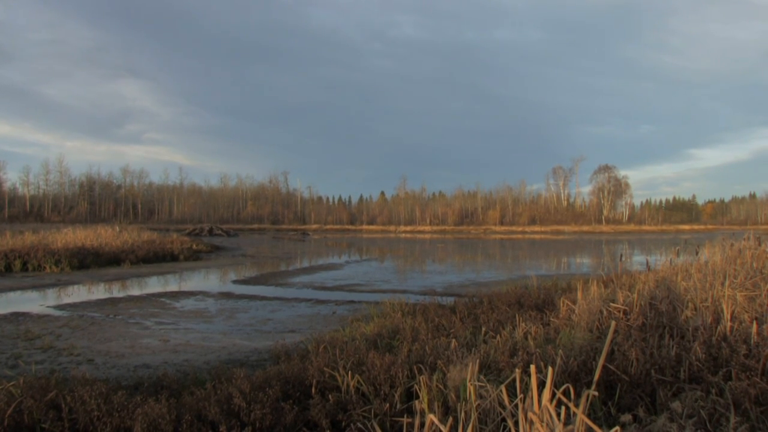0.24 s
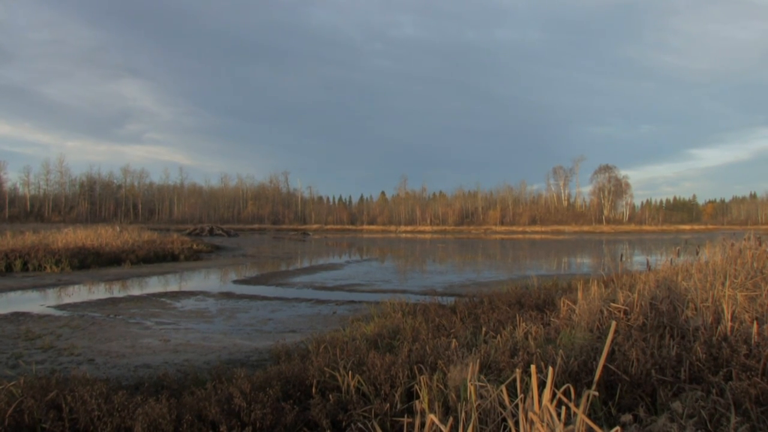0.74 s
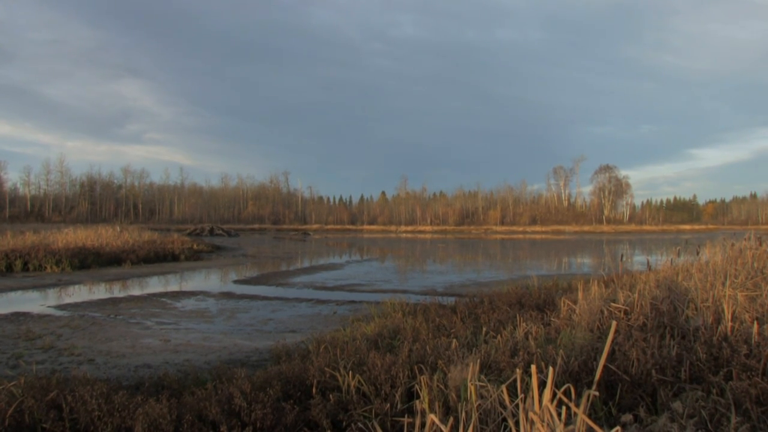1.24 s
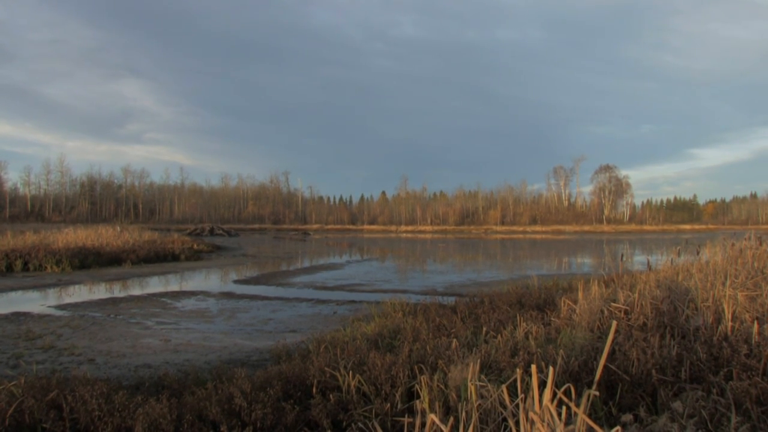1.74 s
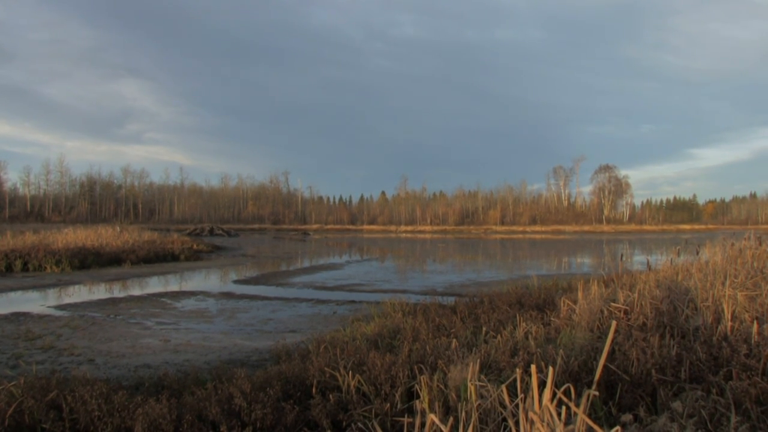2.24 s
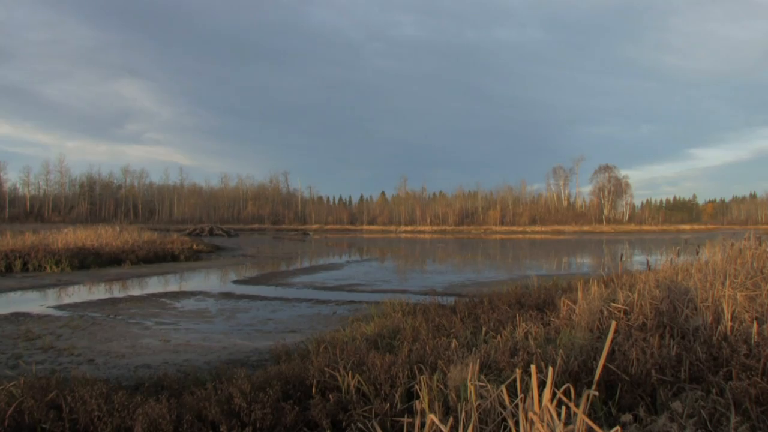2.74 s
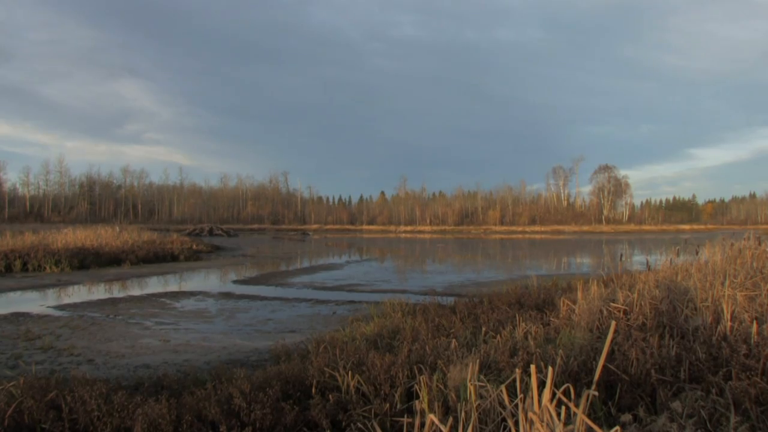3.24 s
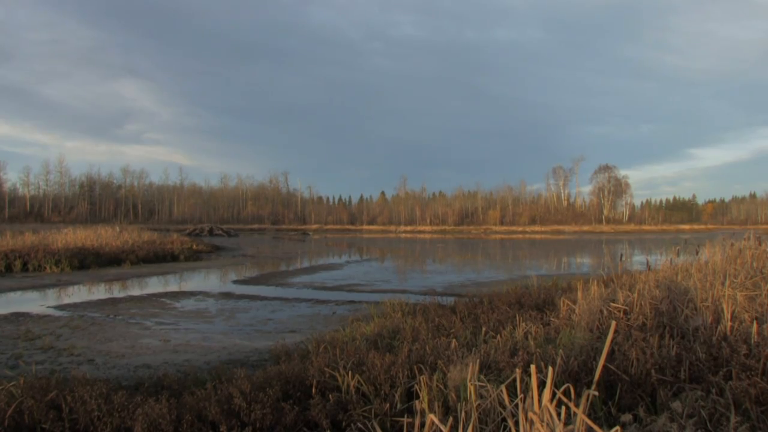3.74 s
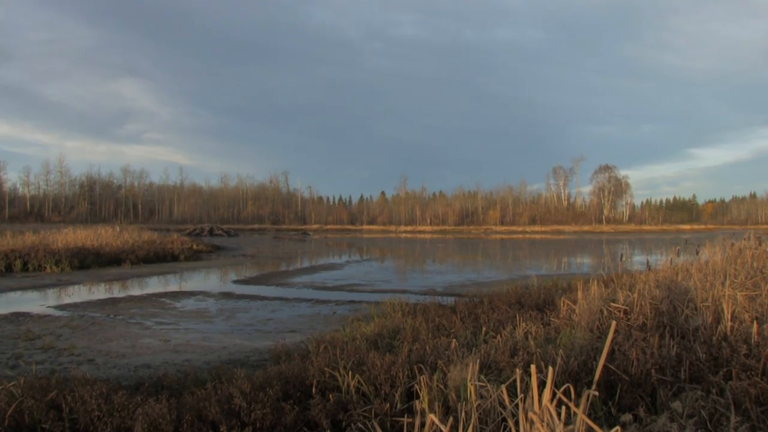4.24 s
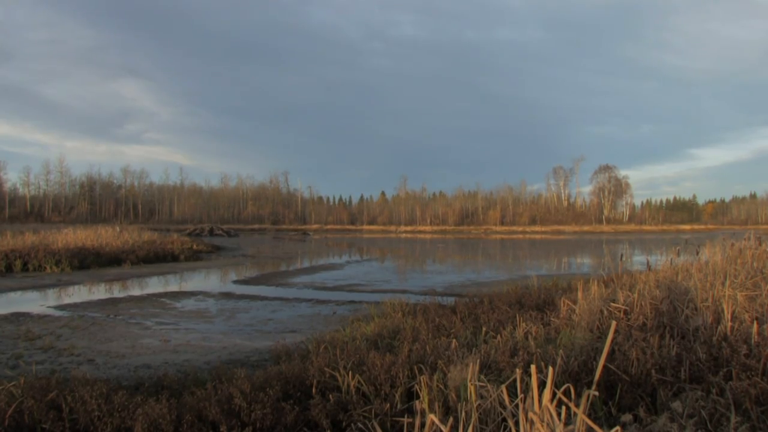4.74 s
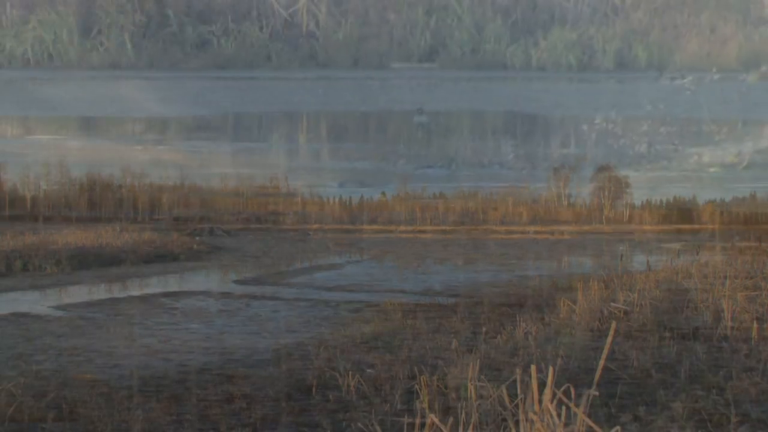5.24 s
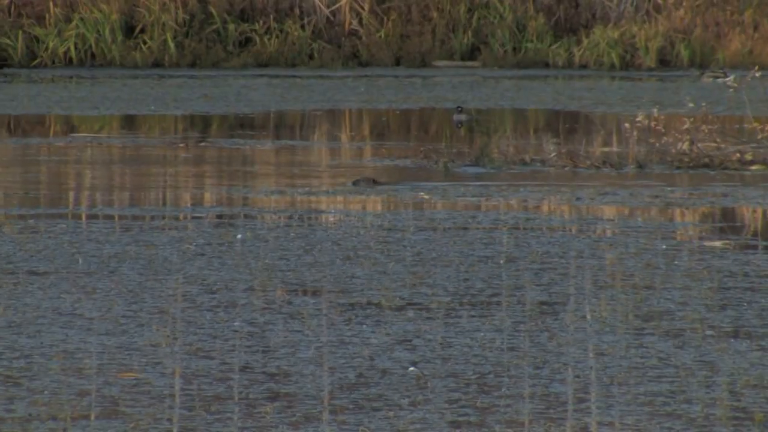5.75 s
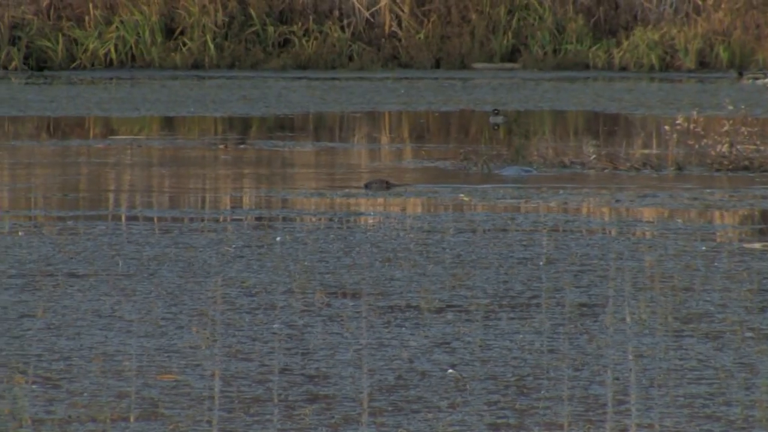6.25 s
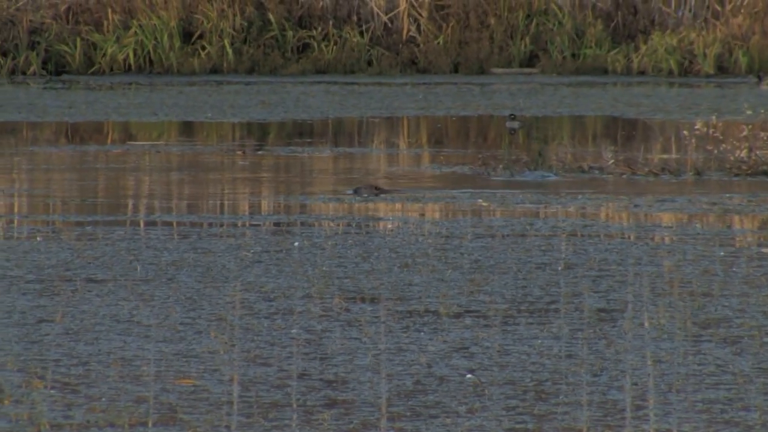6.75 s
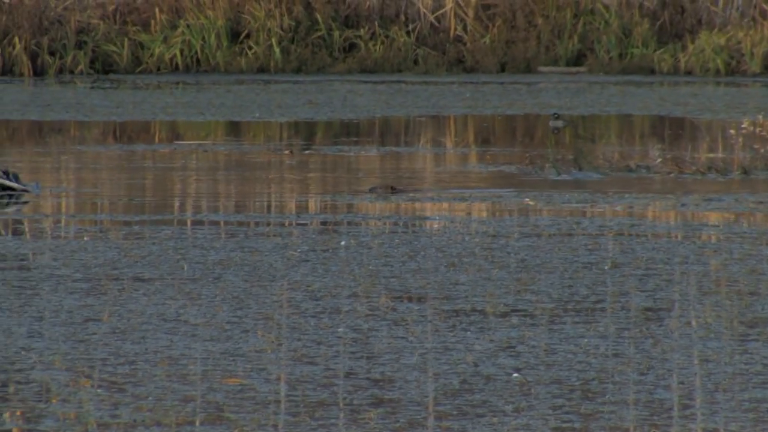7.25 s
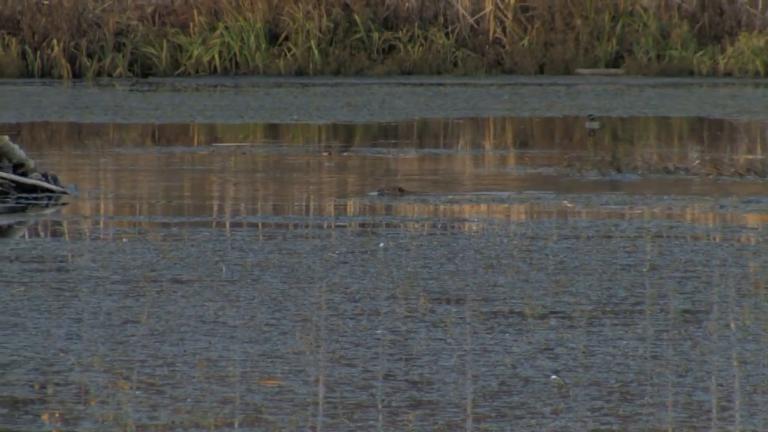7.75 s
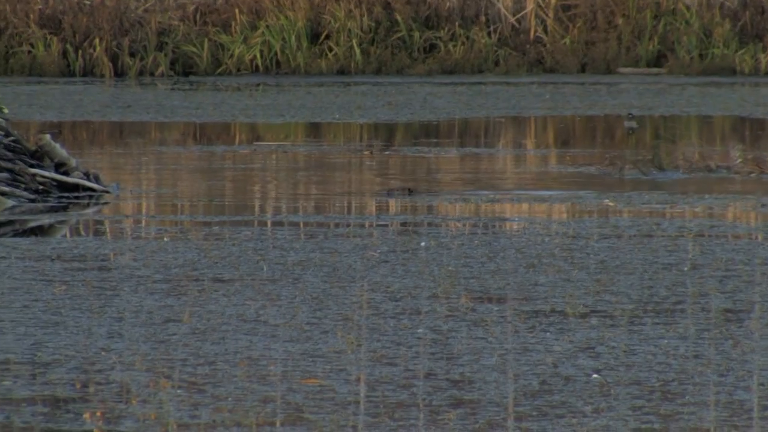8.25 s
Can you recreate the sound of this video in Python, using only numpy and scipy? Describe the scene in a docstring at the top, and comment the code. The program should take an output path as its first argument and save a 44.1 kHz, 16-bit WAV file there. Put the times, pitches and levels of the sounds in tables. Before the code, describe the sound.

Brassy swan calls drift rightward and recede across a lake, echoing off far woods, joined by regular nasal duck quacks close by.

```python
"""Swans leaving a marshy lake

Bugling, yelping and grunting swans fly across from left to right; the forest on the far shore throws calls back.
Their voices are harmonics and noise shaped by windpipe and bill; more of the flock murmurs far away.
From two seconds on a duck close by, dead centre, quacks steadily: trains of snaps ring its throat.
Small ticks, late songbird slurs and, swelling in early, low rumble and thin hiss are shaped noise and gliding tones."""
import sys
import numpy as np
from scipy import signal
from scipy.fft import rfft, irfft, next_fast_len
from scipy.io import wavfile
from scipy.ndimage import uniform_filter1d, map_coordinates

SR = 44100
rng = np.random.default_rng(int(sys.argv[2]) if len(sys.argv) > 2 else 0)


def store_wav(level_fs):
    """Save 16-bit WAV to argv[1]."""
    pcm = np.round(np.clip(np.atleast_2d(level_fs), -1, 1) * 32767)
    wavfile.write(sys.argv[1], SR, pcm.T.astype(np.int16))


N = 374409

# All levels and colours in these tables are relative dB unless called rms.
# Still air, its spectrum: freq_hz, density_db
AIR_COLOUR = [(20,-2.5),(45,3),(70,-9.5),(120,-15),(250,-14.5),(500,-10),(1000,-16),(2500,-19),(5000,-33),(8000,-38),(15000,-38.5)]
# How the still air swells in: time_s, level_db
AIR_RISE = [(0,-33),(1.05,-29.5),(1.4,-6),(2.2,-2),(3,2),(8.49,1)]
# Left-right difference of the air: freq_hz, gain_db
AIR_SIDE = [(100, -35), (600, -9.5), (3000, 25.5), (7000, 16.5), (11000, -5.0)]

# The swan's long windpipe: freq_hz, gain_db
WINDPIPE = [(60,-50.5),(300,-30),(520,-9),(750,-19.5),(1000,-12),(1200,4.5),(1550,3),(1800,-13.5),(2200,-25.5),(3000,-19),(5000,-55),(9000,-66)]
# The brassy edge of a hard-blown bugle: freq_hz, gain_db
BRASS = [(1600,-39),(2200,9.5),(2900,-3.5),(3200,-1.5),(3600,2),(4000,-1),(4400,-2.5),(5050,-1.5),(5500,5),(5800,1.5),(6400,-4),(7300,-15.5),(8000,-17),(8700,-21.5),(9500,-21.5),(12000,-33.5),(16000,-45.5)]
# The edge of a yelp or toot, blown with the bill half shut: freq_hz, gain_db
HALF_SHUT_BILL = [(1600,-28),(2450,11),(3300,-0.5),(4200,4),(5000,1.5),(5900,-2.5),(6900,-5.5),(8200,-22.5),(11000,-31.5),(16000,-49)]
# Falling toots that lead into a bugle or break off its end: start_s, length_s, pitch_hz, level_db, brassy_edge_db
TOOTS = [(0.0,0.039,711,-42,-45), (0.834,0.031,625,-40,-53.5), (1.858,0.021,648,-38,-61),
         (2.202,0.017,670,-39,-49), (2.867,.03,648,-43,-55.5), (3.885,0.043,654.5,-44,-60),
         (4.745,0.035,668,-45,-56.5), (5.776,0.051,661,-45,-65.5), (8.107,0.048,658,-50.5,-84)]
# Low grunts that swoop up near the end: start_s, length_s, top_pitch_hz, drone_db, top_level_db
GRUNTS = [(0.0,0.043,550,-54.5,-46), (0.469,0.21,584.5,-65,-38.5), (0.756,0.06,606,-76,-55.5),
          (1.498,.19,589.4,-60.5,-37.5), (2.13,.13,562,-63,-39), (2.532,.13,590,-57.5,-38.5),
          (3.467,.2,583.7,-59.5,-41), (4.484,0.17,584,-64.5,-41.5), (5.502,.109,572,-63.5,-46),
          (6.347,0.17,556,-74.5,-62), (6.663,0.083,518.4,-67,-56), (7.62,0.077,566,-71.5,-49.5)]
# Long bugle notes: start_s, length_s, attack_s, wait_before_climb_s, opening_hz, crest_hz,
# scoop_from_below (share of pitch), opening_level_db, crest_level_db, brassy_edge_db
BUGLES = [(0.027,0.18,0.024,0.00069,796.4,767.6,0,-31.5,-36.5,-41.5),
          (0.921,.351,0.076,.035,690.7,734.2,0.03,-37,-40.5,-47),
          (1.912,.318,0.011,0.025,688,737,0.1,-41,-43.5,-50.5),
          (2.932,0.3,0.014,.03,679,737.4,0.05,-41,-49,-56),
          (3.952,0.24,0.043,0.092,648.3,728,0.07,-43.5,-51,-57.5),
          (4.813,0.28,0.018,0.046,688.5,724.5,0.08,-48.5,-49,-63),
          (5.858,.225,0.031,.065,673,719.4,.12,-44,-48,-67),
          (7.761,0.21,0.027,0.052,687.2,745.3,0.04,-44.5,-50,-69.5),
          (8.191,0.23,0.015,0.093,679.4,714.6,.08,-46,-46.5,-66.5)]
# Short high yelps: start_s, length_s, top_pitch_hz, level_db, brassy_edge_db
YELPS = [(0.613,0.039,781,-43.5,-71), (0.666,0.053,853,-47,-48.5), (1.61,0.075,779,-48,-68),
         (1.673,0.062,863,-49,-45), (1.833,0.077,811,-40,-45), (2.256,.076,763,-44,-52),
         (2.645,0.048,850,-49.5,-62.5), (2.964,0.057,783,-52.5,-56.5), (3.637,0.075,857,-54.5,-63.5),
         (4.637,0.073,857,-55.5,-56.5), (5.585,0.073,851,-56,-57), (6.482,0.051,820,-52.5,-74),
         (6.738,0.091,814.6,-50,-58.5), (8.209,0.0815,813,-48,-58)]
# Where the swans fly: time_s, left_minus_right_db
BEARING = [(0,7),(.7,2),(1.2,4.5),(1.8,0.5),(2.2,1.5),(2.6,-1.5),(4,-5),(5.7,-7.5),(8.4,-7)]
# Echo gain against the direct calls as the birds draw away: time_s, gain_db
RECEDING = [(0,0.5),(2,2),(3,3),(5,5.5),(6.5,0),(6.9,11.5),(7.6,8),(8.49,-1)]

# The blurred murmur of the far flock: freq_hz, density_db
MURMUR = [(40,-43.5),(130,-20.5),(220,-26),(320,-18.5),(500,-4),(850,-8.5),(1200,7.5),(1550,4),(1900,-22.5),(3000,-7),(5000,-14.5),(6500,-27),(8500,-44.5),(15000,-56.5)]
# The course of the far flock's loudness: time_s, level_db
FLOCK_LEVEL = [(0,-58), (1.4,-65.5), (2.8,-59), (3.4,-70), (5.2,-68.5), (6.5,-70), (7.5,-73.5), (8.49,-62)]
# Decay of the far shore's echo: freq_hz, t60_s
SHORE_T60 = [(400,3.5),(1500,1.9),(4000,0.99),(8000,0.7),(14000,3.5)]
# Colour of the far shore's echo: freq_hz, gain_db
SHORE_COLOUR = [(150,-8),(400,-9.5),(800,-2),(1500,-4.5),(2300,0.5),(3000,-2.5),(4400,10.5),(5800,0.5),(8000,9),(12000,-11)]
# Colour of the scatter from stems and mud close by: freq_hz, gain_db
REED_COLOUR = [(300, -21.5), (1500, -5.5), (3000, 11.5), (6000, 12.0)]

# Small dry ticks, single or in runs: start_s, run_length_s, level_db
TICKS = [(0.3,.005,-52), (0.499,.055,-51), (0.745,.005,-48), (1.506,.055,-51.5), (3.266,.02,-50),
         (3.421,.1,-55.5), (3.902,.11,-54), (4.425,.05,-55), (5.2889,.005,-51), (5.659,.08,-53),
         (5.877,.08,-67), (6.543,.005,-59), (7.448,.03,-60)]
# Colour of the ticks: freq_hz, gain_db
TICK_COLOUR = [(800, -39), (3000, 12), (6000, 7.5), (12000, -18)]
# Quacks: start_s, end_s, nominal_pulse_rate_hz, rms_level_db, bill_opening (factor on throat resonances)
QUACKS = [(2.055,2.152,175,-47,0.87),(2.515,2.65,183.8,-43.5,0.98),(3.091,3.245,182,-41,0.98),(3.663,3.832,189.6,-38,1.002),(4.212,4.379,187.3,-38.5,1),(4.779,4.966,188.4,-37.5,1.01),(5.367,5.528,186.5,-38.5,0.99),(5.93,6.104,186.6,-39,1),(6.545,6.701,187.2,-38,1.002),(7.114,7.289,189,-39,1.007),(7.673,7.848,190,-38,0.99),(8.24,8.405,187,-39,0.99)]
# Course of one quack: share_of_length, pulse_rate_factor, bill_opening (further factor), level_db
QUACK_COURSE = [(0,.83,0.8,-14),(0.151,.9,0.94,-3),(.37,.975,0.97,1),(0.6,1.008,0.98,1),(0.883,1.003,1.01,1),(0.999,.98,0.97,-4)]
# The duck's throat resonances: freq_hz, gain_db
DUCK_THROAT = [(170,-38.5),(250,-15),(370,-11.5),(560,-24),(750,-11.5),(1080,-22.5),(1350,-10),(1560,-12),(1780,1.5),(2130,2),(2450,-7.5),(2800,-27.5),(3150,-22.5),(3700,-54.5),(5600,-40),(8000,-70)]
# The duck's breath hiss: freq_hz, gain_db
DUCK_HISS = [(1000,-19),(3000,3.5),(3800,-7),(5500,3),(7000,-13),(8500,-24),(15000,-33.5)]
# A small songbird's slurs: start_s, length_s, from_hz, to_hz, rms_level_db
CHIRPS = [(7.488,0.11,3080,2770,-79.5),(7.51,0.036,4130,3860,-78),(7.586,0.042,3500,3250,-80),(7.979,0.028,4300,3890,-75),(8.091,0.023,3700,4200,-76),(8.12,.035,3400,3050,-74),(8.13,0.026,4150,3740,-74)]

EDGE_HZ = 15700  # upper limit of the recorder and of the harmonics
DULLING_DB_PER_S = 1.34  # treble lost at 8 kHz as the swans draw away
TOOT_FALL, TOOT_ENDS_DB = 0.072, -11.5  # share of pitch lost over a toot; its softer ends
SWOOP_S, SWOOP = 0.0323, .15  # a grunt's swoop: time and share of pitch
GRUNT_RELEASE_S, GRUNT_END_DB = 0.01475, -14.5  # after the swoop's top the voice shuts
SETTLE_S, SETTLE, SETTLE_DB = .13, .07, -3.5  # this long before its top: sharper (share) and softer
SCOOP_S, DROP_S, DROP = .016, .072, 0.154  # a bugle's slide in, final drop and dropped share of pitch
BUGLE_RELEASE_S, BUGLE_ENDS_DB = 0.031, -9
CATCH_S = .025  # added to a bugle's attack for the decay of its roughness
TICK_GAP_S = .016
YELP_TOP, YELP_ARCH, YELP_ENDS_DB = .62, 0.2033, -7  # share at top pitch; bend of arch; softer ends
THROAT_FLUTTER, SNAP_SHIMMER_DB = .012, .8  # spread from snap to snap: resonances (share) and level


def gain_of(db):
    """Amplitude factor for a level in dB."""
    return 10 ** (np.asarray(db) / 20)


def evened(x):
    """Scales a sound to rms 1 overall."""
    return x / np.sqrt(np.mean(x ** 2) + 1e-20)


def read(points, hz):
    """Reads a spectrum joined by straight lines on a log-frequency axis."""
    f, value = np.transpose(points)
    return np.interp(np.log(hz + 1), np.log(f + 1), value)


def curve(points):
    """A control curve at every sample."""
    return np.interp(np.arange(N) / SR, *np.transpose(points))


def add(mix, s, sound):
    """Lays a sound into the mix at s seconds, cut at the end."""
    part = mix[max(round(s * SR), 0):][:len(sound)]
    part += sound[:len(part)]


def coloured(x, points):
    """Filters x by the spectrum in points."""
    n = next_fast_len(x.shape[-1], True)
    gains = gain_of(read(points, np.fft.rfftfreq(n, 1 / SR)))
    return irfft(rfft(x, n) * gains, n)[..., :x.shape[-1]]


def wander(n, hz):
    """Joins random knots of rms 1, hz of them a second, by straight lines."""
    knots = rng.standard_normal(int(n * hz / SR) + 3)
    return np.interp(np.arange(n) * hz / SR, np.arange(len(knots)), knots)


def clock(length):
    """The time within one call, and the share of it gone by."""
    t = np.arange(0, length, 1 / SR)
    return t, t / length


def soft_ends(t, fade_s=0.001):
    """Opens and closes a call without a click."""
    return np.clip(np.minimum(t, t[-1] - t) / fade_s, 0, 1)


def harmonics(turns, hz, shape, orders, fade_db=0):
    """Partials weighted by a spectrum; each fades on its own as paths over the water cross."""
    k = np.array(orders)[:, None]
    slow_hz = hz[::64]  # gains need only every 64th sample
    drift = rng.standard_normal((len(k), len(slow_hz) // 30 + 3))
    drift = signal.resample(drift, len(slow_hz), axis=1)
    drift -= drift.mean(1, keepdims=True)
    gains = gain_of(read(shape, k * slow_hz) + fade_db * drift) * (k * slow_hz < EDGE_HZ)
    gains = np.repeat(gains, 64, axis=1)[:, :len(hz)]
    phases = (2 * np.pi * k * (turns + k / 17)).astype(np.float32)
    return (gains * np.cos(phases)).sum(0)


def piped(turns, hz, orders):
    """Partials through the windpipe, scaled so that a second harmonic has rms 1."""
    return np.sqrt(2) * harmonics(turns, hz, WINDPIPE, orders) / gain_of(read(WINDPIPE, 2 * hz))


def rasp_and_breath(n):
    """Noise of rms 1 through the windpipe, and through the brassy bill."""
    return [evened(coloured(rng.standard_normal(n), shape)) for shape in (WINDPIPE, BRASS)]


def air(level_db=-68, side_db=-12):
    """Shaped noise: low rumble, nearly alike in both channels, and thin, wider hiss."""
    mid, side = coloured(rng.standard_normal((2, N)), AIR_COLOUR)
    side = gain_of(side_db) * coloured(side, AIR_SIDE)
    return gain_of(level_db + curve(AIR_RISE)) * evened(np.array([mid + side, mid - side]))


def swans(doppler=1.04):
    """The calls as heard here, and raised in pitch as they reach the trees that the birds fly towards."""
    near, ahead = np.zeros((2, N)), np.zeros(N)
    for call, rows in ((bugle, BUGLES), (yelp, YELPS), (toot, TOOTS), (grunt, GRUNTS)):
        for row in rows:
            s, (left, right, beam) = call(*row)
            add(near[0], s, left)
            add(near[1], s, right)
            at = np.arange(len(beam))
            add(ahead, s, np.interp(np.arange(0, at[-1], doppler), at, beam))
    return near, ahead


def honk(start, t, hz, level_db, edge_db, brass, catch_s=0.045, rasp_db=-5, breath_db=-22, croak_db=-20,
         fade_db=2.5, apart=0.75, size_db=1, beam_db=-3):
    """A voice catches roughly, then locks into a clean note; gives left, right and the beam ahead of the bird."""
    brass = [(f, db - DULLING_DB_PER_S * start * (f / 8000) ** 2) for f, db in brass]
    rough = np.exp(-(t / min(catch_s, 0.19 * t[-1])) ** 2) + 0.048
    jitter = (.003 + .03 * rough) * wander(len(t), 500)
    turns = np.cumsum(hz * (1 + jitter + .003 * wander(len(t), 34.7))) / SR
    rasp, breath = rasp_and_breath(len(t))
    catch = rough * (gain_of(rasp_db) * rasp + gain_of(croak_db) * breath)
    body = gain_of(level_db) * (piped(turns, hz, range(1, 4)) + catch)
    # a second set of partials with other phases widens the edge
    mid, side = (evened(harmonics(turns + shift, hz, brass, range(3, 20), fade_db))
                 for shift in (0, rng.random()))
    # the brassy edge comes last, goes first, and is full only near the top of the pitch
    blown = soft_ends(t, fade_s=0.024) * np.clip((hz / hz.max() - .91) / 0.058, .1, 1)
    hiss = gain_of(breath_db) * breath
    edge = gain_of(edge_db) * (blown * np.array([mid + apart * side, mid - apart * side]) + hiss)
    beam = gain_of((edge_db + level_db) / 2 + beam_db) * blown * (mid + hiss)
    flutter = 1 + 0.046 * wander(len(t), 99)
    return start, gain_of(size_db) * soft_ends(t) * (body + np.vstack([edge, beam])) * flutter


def toot(start, length, hz, level_db, edge_db):
    """A brief, slightly falling note, softer at both ends."""
    t, u = clock(length)
    level_db = level_db + TOOT_ENDS_DB * (2 * u - 1) ** 2
    return honk(start, t, hz * (1 - TOOT_FALL * (u - .5)), level_db, edge_db, HALF_SHUT_BILL)


def grunt(start, length, top_hz, drone_db, top_db, half_db=-16, rasp_db=-15, croak_db=-23, size_db=2, hoarse=1.1):
    """A hoarse drone swoops up; strong and weak cycles alternate, which puts lines between the harmonics."""
    t, _ = clock(length)
    to_top = length - GRUNT_RELEASE_S - t
    swoop = np.exp(-(to_top / SWOOP_S) ** 2)
    early = np.minimum(abs(to_top) / SETTLE_S, 1) ** 4
    hz = top_hz * (1 - SWOOP * (1 - swoop) + SETTLE * early)
    shut_db = GRUNT_END_DB * np.minimum(to_top / GRUNT_RELEASE_S, 0) ** 2
    level_db = drone_db + (top_db - drone_db) * swoop + SETTLE_DB * early + shut_db
    turns = np.cumsum(hz * (1 + .012 * wander(len(t), 400))) / SR
    halves = gain_of(half_db) * (1 + 1.6 * wander(len(t), 64)) * piped(turns, hz, np.arange(2, 10) + .5)
    rasp, breath = rasp_and_breath(len(t))
    voice = piped(turns, hz, range(1, 3)) + .35 * piped(turns, hz, range(3, 14))
    noise = (gain_of(rasp_db) + hoarse * early) * rasp + gain_of(croak_db) * breath
    sound = (1 - .5 * early) * voice + halves + noise
    # left, right and the weaker beam ahead
    return start, np.outer([1, 1, .6], soft_ends(t) * gain_of(level_db + size_db) * sound)


def placed(near, samples_per_db=0.55):
    """The channel on the birds' side is louder, and the two differ slightly in delay."""
    bearing_db, at = curve(BEARING), np.arange(N)
    channels = []
    for channel, side in zip(near, (.5, -.5)):
        moved = map_coordinates(channel, [at - side * samples_per_db * bearing_db], order=3)
        channels.append(gain_of(side * bearing_db) * moved)
    return np.array(channels)


def reeds(x, decay_s=0.05):
    """Stems and mud close by scatter a short, diffuse reflection, different in each channel."""
    t = np.arange(4096) / SR
    taps = rng.standard_normal((2, len(t))) * np.exp(-t / decay_s)
    taps = coloured(taps / np.linalg.norm(taps[0]), REED_COLOUR)
    return signal.oaconvolve(x[None], taps, axes=1)[:, :N]


def flock(near_calls, count=60, calls_db=-6, murmur_db=2.0, wash_db=-15, linger_s=0.045, ceiling_db=-50):
    """Far calls, random arches of pitch, over a noise murmur; a diffuse wash after each near call lifts both."""
    calls = np.zeros(N)
    for when, pitch, length, size in rng.random((count, 4)):
        u = np.linspace(0, 1, int((0.0823 + 0.2176 * length) * SR))
        hz = (490 + 300 * pitch) * (.93 + .08 * np.sin(np.pi * u))
        voice = harmonics(np.cumsum(hz) / SR, hz, WINDPIPE, range(1, 5))
        add(calls, when * N / SR, (1 + size) * np.sin(np.pi * u) * voice)
    mid, side = coloured(rng.standard_normal((2, N)), MURMUR)
    murmur = evened(np.array([mid + 0.092 * side, mid - 0.39 * side]))
    # a lingering average of the near calls' power, capped, raises a diffuse wash over the lake
    keep = np.exp(-1 / (linger_s * SR))
    power = np.minimum(near_calls ** 2, gain_of(ceiling_db) ** 2)
    wash = signal.lfilter([1 - keep], [1, -keep], power)
    level = np.sqrt(gain_of(curve(FLOCK_LEVEL)) ** 2 + gain_of(wash_db) ** 2 * wash)
    return level * gain_of(calls_db) * evened(calls), level * gain_of(murmur_db) * murmur


def shore(x, build_s=0.064, width=0.72):
    """Countless trunks scatter the sound back; the echo builds slowly and decays fastest around 8 kHz."""
    hits = rng.random((2, 2 * SR)) < 2000 / SR  # about 2000 reflections a second
    taps = rng.standard_normal((2, 2 * SR)) * hits
    hz, t, z = signal.stft(taps, SR, nperseg=256)
    decay_db = -60 * t / read(SHORE_T60, hz)[:, None]
    build = 1 - np.exp(-(t / build_s) ** 2)
    z = z * gain_of(read(SHORE_COLOUR, hz)[:, None] + decay_db) * build
    tail = signal.istft(z, SR, nperseg=256)[1]
    mid, side = signal.fftconvolve(x[None], tail / np.linalg.norm(tail[0]), axes=1)[:, :N]
    return np.array([mid + width * side, mid - width * side])


def bugle(start, length, attack, wait, open_hz, crest_hz, scoop, open_db, crest_db, edge_db, edge_late_db=-5):
    """Slides into its note, climbs to a crest and drops as the breath runs out; the brass needs longer to sound."""
    t, _ = clock(length)
    crest = length - DROP_S
    climb = np.clip((t - wait) / (crest - wait), 0, 1)
    drop = DROP * np.clip((t - crest) / DROP_S, 0, 1) ** 2.74
    hz = (open_hz + (crest_hz - open_hz) * climb) * (1 - scoop * np.exp(-t / SCOOP_S) - drop)
    ends = np.maximum(1 - np.minimum(t / attack, (length - t) / BUGLE_RELEASE_S), 0)
    level_db = open_db + (crest_db - open_db) * climb + BUGLE_ENDS_DB * ends
    edge_db = edge_db + 1 + edge_late_db * np.exp(-t / (2 * attack))
    return honk(start, t, hz, level_db, edge_db, BRASS, catch_s=attack + CATCH_S)


def ticks(decay_s=0.0013, level_db=-7, uneven_db=2):
    """Tiny dry clicks of decaying noise, single or in quick uneven runs."""
    out, t = np.zeros(N), np.arange(512) / SR
    for start, length, db in TICKS:
        for s in np.arange(0, length, TICK_GAP_S):
            late, size = rng.standard_normal(2)
            click = rng.standard_normal(len(t)) * np.exp(-t / decay_s)
            gain = gain_of(db + level_db + uneven_db * size)
            add(out, start + s + min(s, .002) * late, gain * click)
    return coloured(out, TICK_COLOUR)


def yelp(start, length, top_hz, level_db, edge_db, peak_share=0.31, edge_ends_db=-7):
    """One quick arch of pitch and loudness, loudest and brassiest about a third of the way in."""
    t, u = clock(length)
    hz = top_hz * (1 - YELP_ARCH * (u - YELP_TOP) ** 2)
    ends = (2 * (u - peak_share)) ** 2
    level_db = level_db + 0.5 + YELP_ENDS_DB * ends
    return honk(start, t, hz, level_db, edge_db + 1 + edge_ends_db * ends, HALF_SHUT_BILL)


def throat_ring():
    """The throat's minimum-phase impulse response, at ten times the sample rate."""
    log_gain = np.log(gain_of(read(DUCK_THROAT, abs(np.fft.fftfreq(4096, 1 / SR)))))
    ring = np.fft.ifft(np.exp(np.conj(signal.hilbert(log_gain)))).real[:1024]
    return signal.resample_poly(np.pad(ring, 10), 10, 1)


def duck(jitter_s=.00003, hiss_db=-32, rebound=0.39, rebound_s=0.002078):
    """Each membrane snap, and a weak rebound, rings the throat; its resonances rise as the bill opens."""
    ring, out = throat_ring(), np.zeros(N)
    share, *columns = np.transpose(QUACK_COURSE)
    for start, end, rate, level_db, opening in QUACKS:
        u = np.linspace(0, 1, int((end - start) * SR))
        pitch, bill, swell_db = (np.interp(u, share, c) for c in columns)
        snaps = np.flatnonzero(np.diff(np.floor(np.cumsum(rate * pitch) / SR), prepend=-1))
        quack = np.zeros(len(u) + 1024)
        for i, (late, size, colour, slack) in zip(snaps, rng.standard_normal((len(snaps), 4))):
            # reading the ring faster raises its resonances
            step = 10 * opening * bill[i] * (1 + THROAT_FLUTTER * colour)
            snap = map_coordinates(ring, [np.arange(0, len(ring) - 1, step)], order=1)
            snap = gain_of(swell_db[i] + SNAP_SHIMMER_DB * size) * snap
            add(quack, i / SR + jitter_s * late, snap)
            add(quack, i / SR + rebound_s * (1 + 0.15 * slack), rebound * snap)
        hiss = evened(coloured(rng.standard_normal(len(quack)), DUCK_HISS))
        # the hiss follows the quack's short-term loudness
        puffs = np.sqrt(abs(uniform_filter1d(evened(quack) ** 2, size=160)))
        add(out, start, gain_of(level_db) * (evened(quack) + gain_of(hiss_db) * puffs * hiss))
    return out


def songbird():
    """Faint pure slurs from the reeds: sines gliding under a smooth swell."""
    out = np.zeros(N)
    for start, length, from_hz, to_hz, level_db in CHIRPS:
        hz = np.linspace(from_hz, to_hz, int(length * SR))
        slur = np.hanning(len(hz)) * np.sin(2 * np.pi * np.cumsum(hz) / SR)
        add(out, start, gain_of(level_db) * evened(slur))
    return out


def scene(echo_db=-11.5, duck_echo_db=-35, swan_scatter_db=-19, duck_scatter_db=-19):
    """Swans crossing, the duck straight ahead, and the lake around them."""
    quacks = duck()
    near, ahead = swans()
    far_calls, murmur = flock(near.mean(0))
    to_shore = gain_of(echo_db + curve(RECEDING)) * ahead + gain_of(duck_echo_db) * quacks + far_calls
    to_reeds = gain_of(swan_scatter_db) * near.mean(0) + gain_of(duck_scatter_db) * quacks
    birds = placed(near) + quacks + murmur + songbird()
    return birds + shore(to_shore) + reeds(to_reeds) + air() + ticks()


def record(dry):
    """The band limit of the recorder: a steep low-pass."""
    low_pass = signal.firwin(511, EDGE_HZ, window=("kaiser", 9), fs=SR)
    return signal.oaconvolve(dry, low_pass[None], "same")


dry = scene()
out = record(dry)
store_wav(out)
```